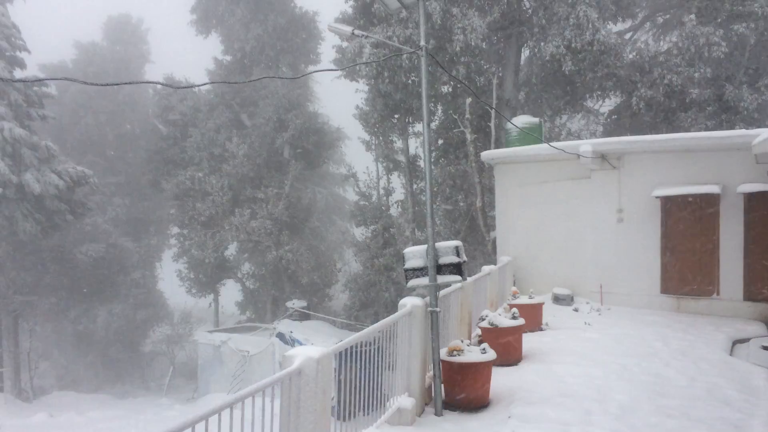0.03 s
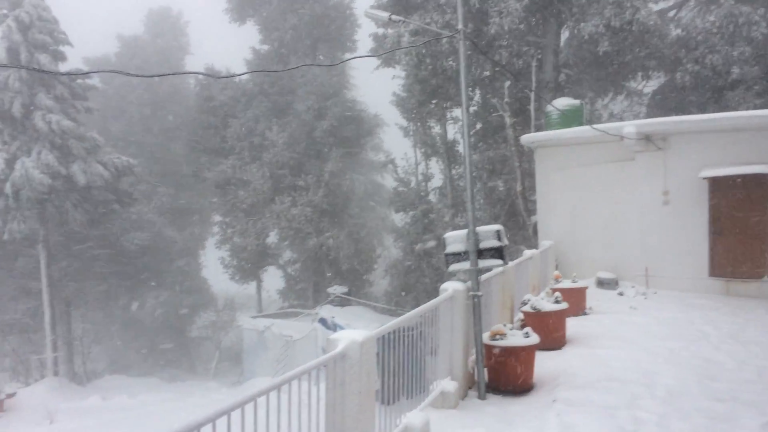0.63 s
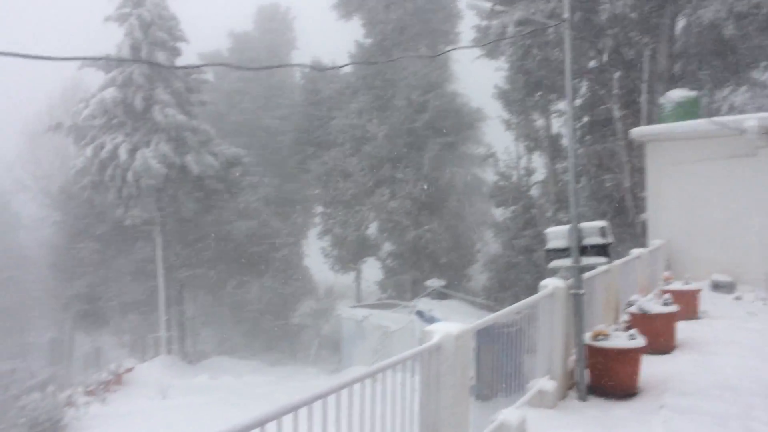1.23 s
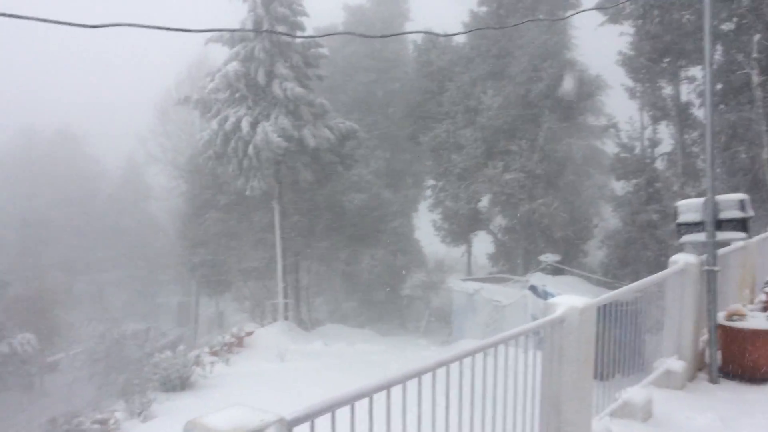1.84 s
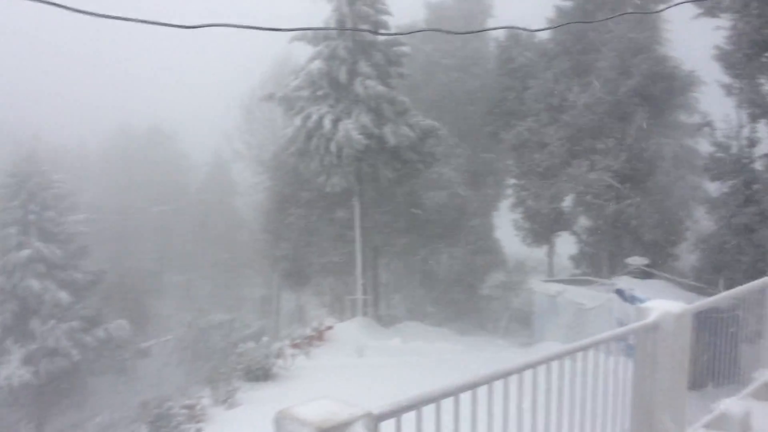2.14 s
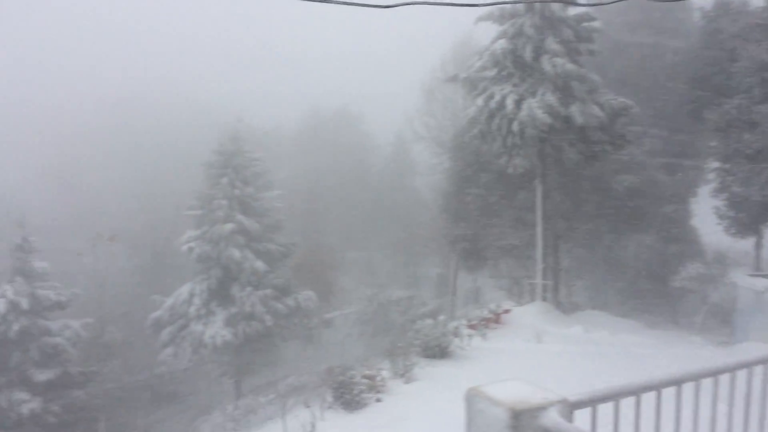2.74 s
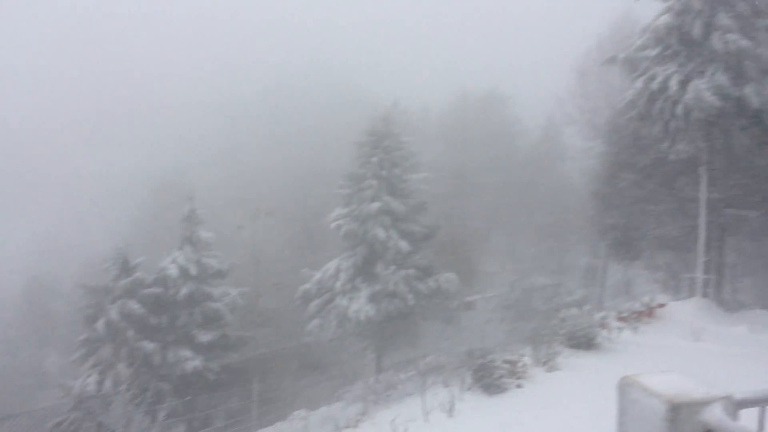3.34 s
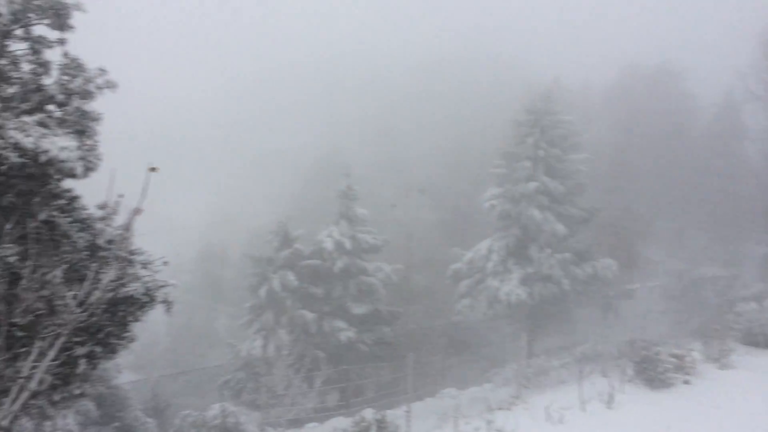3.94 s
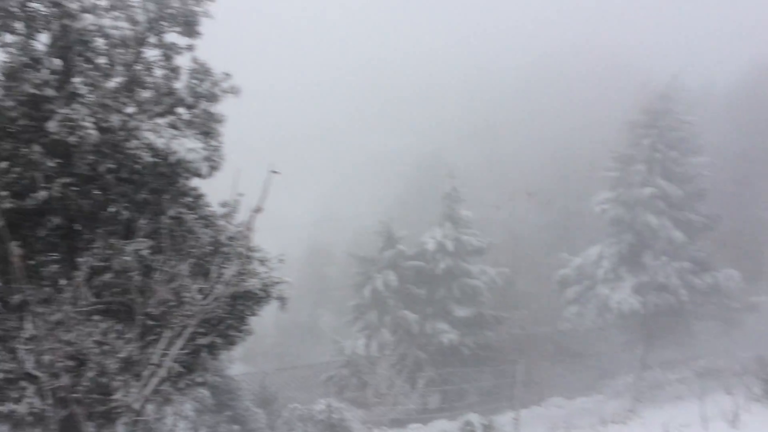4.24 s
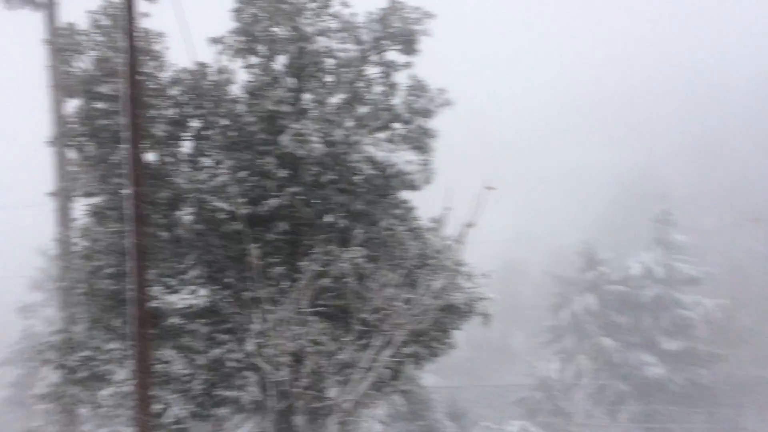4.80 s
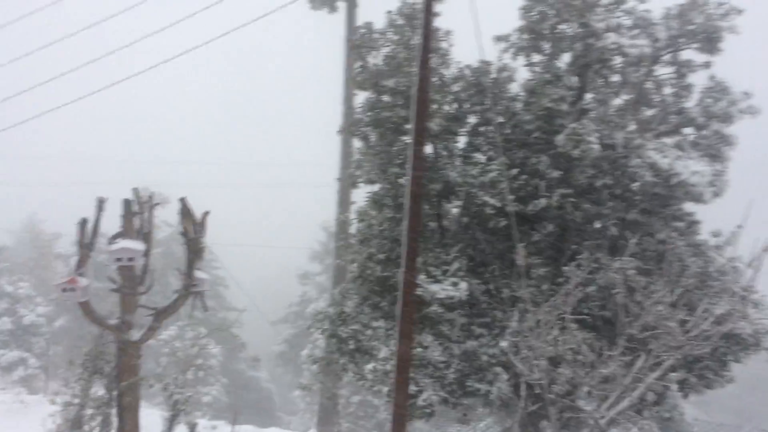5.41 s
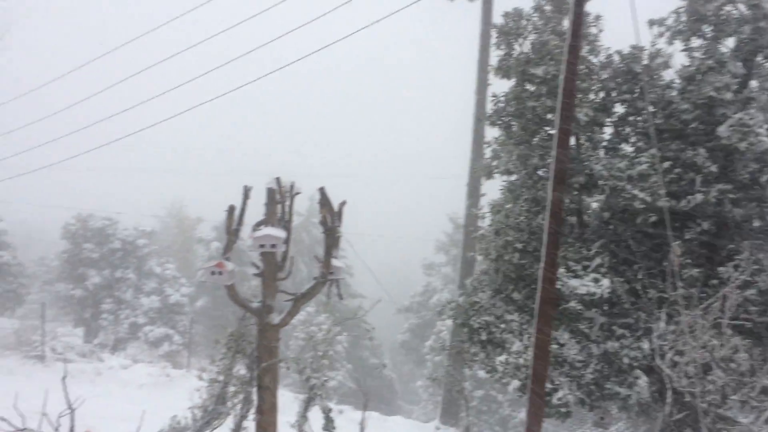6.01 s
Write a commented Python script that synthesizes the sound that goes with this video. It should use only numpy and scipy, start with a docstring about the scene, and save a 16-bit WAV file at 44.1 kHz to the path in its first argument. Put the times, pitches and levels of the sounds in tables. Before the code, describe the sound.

Outdoors in falling snow, wind rumbles and thumps on the microphone, easing briefly and then gusting harder.

```python
"""A gusty rumble of wind on a small hand-held microphone, in a snowstorm on a wooded hillside.
Turbulent eddies sweep over the port: the faster the air, the louder and higher the rumble,
and single vortices strike as dull pops. Behind it trees rush, blown snow hisses and grains tick
on the casing. A few faint, thin whistles sound far off, and finger knocks ring the casing's modes."""
import sys
import numpy as np
from scipy import signal
from scipy.fft import rfft, irfft, next_fast_len
from scipy.io import wavfile
from scipy.ndimage import uniform_filter1d, map_coordinates

SR = 44100
rng = np.random.default_rng(int(sys.argv[2]) if len(sys.argv) > 2 else 0)


def dump_mix(stems):
    """Bounce the given channels to the path in sys.argv[1] as a 16-bit WAV at rate SR."""
    frames = np.atleast_2d(stems).T  # one column per channel
    limited = np.clip(frames, -1, 1)  # hard clip at full scale
    pcm = np.round(limited * 32767).astype(np.int16)
    wavfile.write(sys.argv[1], SR, pcm)


N = 267246
TIME = np.arange(N) / SR


def from_db(db):
    """Amplitude ratio of a level in decibels."""
    return 10 ** (np.asarray(db) / 20)

def rms_one(x):
    """Normalisation to unit rms."""
    return x / np.sqrt(np.mean(x ** 2) + 1e-20)

def in_time(rows):
    """Linear interpolation of each column of a time curve at every sample."""
    times, *columns = np.transpose(rows)
    return [np.interp(TIME, times, column) for column in columns]

def butter(x, hz, kind, order=2):
    """Causal Butterworth filter."""
    sections = signal.butter(order, np.minimum(hz, .45 * SR), kind, fs=SR, output="sos")
    return signal.sosfilt(sections, x + 1e-18)

def fluctuation(hz, order=4):
    """Low-passed Gaussian noise of unit rms."""
    return rms_one(butter(rng.standard_normal(N), hz, "low", order))


# Breeze at the port: (time [s], eddy passing rate [Hz], relative pressure level [dB])
BREEZE = [(0.09, 228, -26.5), (0.44, 280.8, -23.5), (0.72, 179.8, -36), (0.98, 173.2, -29.5),
          (1.33, 202.4, -32.0), (1.44, 79, -44), (1.61, 125.3, -36.5), (2.04, 194.3, -26.5),
          (2.56, 161.6, -33.5), (2.77, 66.14, -43.5), (3.11, 117, -37.5), (3.33, 202.6, -19.5),
          (3.57, 151.3, -31.5), (3.82, 365.8, -19), (4.18, 289.9, -27.0), (4.81, 458.7, -19),
          (5.03, 220.3, -26.5), (5.14, 289.9, -21.5), (5.52, 183.9, -28), (6.06, 174.5, -29.5)]
# Gusts on top of it: (arrival [s], hold [s], relative pressure level [dB])
GUSTS = [(0.108, 0.019, -16), (0.184, 0.067, -23), (0.286, 0.075, -18), (0.52, 0.035, -24),
         (0.577, 0.0092, -14.0), (0.724, 0.0068, -18.0), (0.806, 0.017, -18.5), (0.862, 0.013, -21),
         (1.081, 0.07, -25.5), (1.238, 0.086, -26), (1.489, 0.11, -24), (1.633, 0.097, -21),
         (1.827, 0.025, -19.5), (2.127, 0.074, -17), (2.287, 0.0077, -23), (2.359, 0.019, -19.0),
         (2.434, 0.056, -23.5), (2.64, 0.064, -30), (2.773, 0.02, -31.5), (2.865, 0.042, -34.5),
         (3.023, 0.023, -31.5), (3.117, 0.011, -28.5), (3.172, 0.014, -25), (3.246, 0.073, -16.5),
         (3.427, 0.13, -24), (3.625, 0.089, -13.5), (3.748, 0.058, -17), (3.883, 0.064, -19),
         (3.977, 0.05, -17), (4.289, 0.069, -16.5), (4.452, 0.13, -13.5), (4.64, 0.017, -18.5),
         (4.721, 0.044, -15.3), (4.943, 0.021, -20.5), (5.211, 0.004, -16), (5.257, 0.034, -16),
         (5.353, 0.037, -22.5), (5.431, 0.022, -24), (5.605, 0.085, -25.5), (5.974, 0.029, -30)]

def airflow(rise_db_per_s=680, fall_db_per_s=820, surge_db=2, surge_hz=24.06, rate_exponent=.39):
    """Breeze and gusts add in power; the eddy passing rate follows a power law of the pressure."""
    breeze_hz, breeze_db = in_time(BREEZE)
    power = from_db(breeze_db) ** 2
    for arrival, hold_s, db in GUSTS:
        before_db = rise_db_per_s * np.maximum(arrival - TIME, 0)
        after_db = fall_db_per_s * np.maximum(TIME - arrival - hold_s, 0)
        power += from_db(db - np.minimum(before_db + after_db, 100)) ** 2
    pressure_db = 10 * np.log10(power) + surge_db * np.tanh(fluctuation(surge_hz))
    return breeze_hz * from_db(pressure_db - breeze_db) ** rate_exponent, pressure_db

def eddy_pressure(eddies_passed, steepness=1.32, smoothing_eddies=1.373, size=2 ** 18):
    """Spatial averaging: the port smooths away the fine ripples of a passing random pressure field."""
    steps_per_eddy = 64
    cycles_per_eddy = np.fft.rfftfreq(size) * steps_per_eddy
    rolloff = np.exp(-(smoothing_eddies * cycles_per_eddy) ** steepness)
    field = irfft(rfft(rng.standard_normal(size)) * rolloff, size)
    return map_coordinates(field, [eddies_passed * steps_per_eddy], order=3, mode="wrap")

def evened(x, span_s):
    """Division by the smoothed envelope holds the rms of a noise near 1."""
    power = np.abs(signal.hilbert(x, next_fast_len(N))[:N]) ** 2 / 2
    for _ in range(3):
        power = uniform_filter1d(power, int(span_s * SR))
    return x / np.sqrt(np.abs(power) + 1e-12)

def wind_rumble(rate_hz, pressure_db, level_db, flutter_db, flutter_hz, bass_cut_hz):
    """Frozen turbulence: eddies ride past the port, so air speed stretches the whole spectrum."""
    speed_ratio = from_db(flutter_db * np.tanh(fluctuation(flutter_hz)))
    eddies_passed = np.cumsum(rate_hz * speed_ratio) / SR
    pressure = speed_ratio ** 2 * eddy_pressure(eddies_passed)  # pressure goes with speed squared
    rumble = from_db(pressure_db + level_db) * evened(pressure, span_s=0.016)
    return butter(rumble, bass_cut_hz, "high", order=3)  # the microphone drops the deepest bass


def coloured_noise(spectrum):
    """Spectral shaping of white noise, at unit rms."""
    hz, db = np.transpose(spectrum)
    bin_hz = np.maximum(np.fft.rfftfreq(N, 1 / SR), 1)
    gain = from_db(np.interp(np.log(bin_hz), np.log(hz), db))
    return rms_one(irfft(rfft(rng.standard_normal(N)) * gain, N))

# Wind in the trees: (time [s], level [dB])
TREE_LEVEL = [(0, -62), (.9, -63.5), (1.4, -59), (2.0, -59.5), (3.1, -59), (3.5, -62.5), (5.4, -63),
              (5.7, -60), (6.06, -59)]
# Its spectrum: (frequency [Hz], relative spectral density [dB])
TREE_SPECTRUM = [(100, -2), (350, 0), (600, -2.5), (1000, -5), (1500, -8.5), (2000, -17), (3000, -27),
                 (7000, -50)]

def tree_rush():
    """Aerodynamic noise: wind in distant trees makes a smooth, dark rush."""
    return from_db(in_time(TREE_LEVEL)[0]) * coloured_noise(TREE_SPECTRUM)


# Blown snow: (time [s], level [dB])
SNOW_LEVEL = [(.1, -72), (.95, -75.5), (1.25, -70.5), (2.1, -73.5), (3.2, -71), (3.35, -76), (4.8, -75.5),
              (5.5, -74), (5.72, -68.5), (6.06, -68)]
# Its spectrum: (frequency [Hz], relative spectral density [dB])
SNOW_SPECTRUM = [(500, -10), (2000, 0), (4500, 0), (7000, -2), (10000, -5), (13000, -8), (16000, -14)]

def snow_hiss():
    """Incoherent summation: countless drifting grains merge into a fine hiss."""
    return from_db(in_time(SNOW_LEVEL)[0]) * coloured_noise(SNOW_SPECTRUM)


# Largest snow grains on the casing: (time [s], relative level [dB])
LARGE_GRAINS = [(4.0097, -47.5), (4.219, -48), (4.3881, -43), (4.5467, -38.5), (4.7802, -43.5),
                (4.9152, -43.5), (5.1875, -42), (5.5174, -45.5), (5.5986, -46), (5.6161, -44), (5.697, -43),
                (6.0245, -37)]

def snow_ticks(large_db, decay_s, low_hz, high_hz, grains_per_s=30):
    """Impact noise: each icy grain crumbles on the casing in a bright, exponentially decaying burst."""
    # tiny grains land at random, as strongly as the snow blows
    landings = rng.random(N) < grains_per_s / SR
    hits = landings * rng.random(N) * from_db(in_time(SNOW_LEVEL)[0] + 2.0)
    for time, db in LARGE_GRAINS:
        hits[round(time * SR)] += from_db(db + large_db)
    envelope = signal.lfilter([1], [1, -np.exp(-1 / (decay_s * SR))], hits + 1e-18)
    bursts = envelope * rng.standard_normal(N)
    return butter(butter(bursts, low_hz, "high"), high_hz, "low")


def vortex_pulses(rows, level_db, steepness, size=2048):
    """Time scaling: a vortex is one swing of pressure, shorter and brighter the faster it passes."""
    out, hz = np.zeros(N + size), np.fft.rfftfreq(size, 1 / SR)
    # the angle of incidence makes it a push, a pull or one after the other
    angles = rng.uniform(0, 2 * np.pi, N)
    for time, db, rate_hz in rows:
        at = round(time * SR)
        spectrum = hz / rate_hz * np.exp(-(hz / rate_hz) ** steepness)
        head_on_peak = irfft(spectrum, size)[0]
        pulse = np.fft.fftshift(irfft(spectrum * np.exp(1j * angles[at]), size)) / head_on_peak
        out[at:at + size] += from_db(db + level_db) * pulse * np.hanning(size)
    return out[size // 2:size // 2 + N]

def small_vortices(rate_hz, pressure_db, level_db, rate_ratio, spread_db, storm_hz, candidates=900):
    """Vortex shedding: rows of small vortices whose number grows with the square of the air speed."""
    when, chance, weakness = rng.random((candidates, 3)).T
    at = (when * (N - 1)).astype(int)
    db = pressure_db[at] + level_db - spread_db * weakness
    rows = np.transpose([TIME[at], db, rate_ratio * rate_hz[at]])
    return rows[chance < (rate_hz[at] / storm_hz) ** 2]

def fragments(rows, loss_db, rate_ratio, scatter_s, spread_db=3, count=3):
    """Vortex breakup on the port's rim: rows of weaker, quicker vortices that make each pop ragged."""
    time, db, rate_hz = np.repeat(rows, count, axis=0).T
    shift, strength = rng.uniform(-1, 1, (len(time), 2)).T
    fragment_db = db - loss_db + spread_db * strength
    return np.transpose([time + scatter_s * shift, fragment_db, rate_ratio * rate_hz])

# Hardest vortices at the port: (time [s], relative level [dB], passing rate [Hz])
HARD_VORTICES = [(0.129, -7.5, 151), (0.217, -15, 365), (0.356, -17.5, 603), (0.587, -11.5, 544),
                 (0.723, -17.5, 607), (0.736, -5, 482), (0.812, -7, 375), (0.865, -13.5, 385.5),
                 (1.716, -17.5, 492.2), (2.177, -14.5, 646), (2.363, -12, 424.2), (3.285, -9, 454.6),
                 (3.642, -11, 354.8), (3.665, -9.5, 1095), (3.7, -6.5, 698), (3.758, -10.5, 581.8),
                 (3.781, -13.5, 451), (3.808, -11, 602.2), (3.915, -3, 329.6), (4.017, -9.5, 458),
                 (4.287, -9.5, 598), (4.349, -9, 490.4), (4.411, -1.5, 230.2), (4.451, -6, 542),
                 (4.488, -9, 538), (4.523, 0, 598.4), (4.548, -17, 1545), (4.557, -4.5, 1309),
                 (4.577, -9.5, 770.5), (4.636, -7, 775.2), (4.728, -3, 1203), (4.744, -10.5, 767),
                 (4.775, -10, 996.5), (4.883, -11, 938.8), (5.21, -7, 529.4), (5.26, -7.5, 504.2),
                 (5.43, -8.5, 300.7)]

def vortex_pops(rate_hz, pressure_db):
    """Superposition of pressure pulses: hard vortices pop, small ones and fragments crackle."""
    shed = small_vortices(rate_hz, pressure_db, level_db=1, rate_ratio=1.13, spread_db=14.5, storm_hz=481)
    broken = fragments(HARD_VORTICES, loss_db=18, rate_ratio=1.154, scatter_s=.004)
    pops = vortex_pulses(HARD_VORTICES, level_db=-1, steepness=1.705)
    crackle = vortex_pulses(np.vstack([shed, broken]), level_db=-3, steepness=1.334)
    return pops + crackle


# Thin, far whistles: (centre time [s], half duration [s], frequency [Hz], greatest rms level [dB])
WHISTLES = [(0.317, 0.036, 3420, -72.5), (0.37, 0.045, 3470, -82), (0.46, 0.077, 3400, -73),
            (0.466, 0.09, 5560, -81), (1.306, 0.056, 1130, -60), (1.454, 0.053, 1110, -63.5),
            (1.326, 0.089, 5600, -82), (1.46, 0.073, 5600, -79)]

def whistles(waver_hz):
    """Random frequency modulation makes short tones waver as they swell and fade."""
    out = np.zeros(N)
    waver = waver_hz * fluctuation(60, order=2)
    for centre, half_s, hz, db in WHISTLES:
        swell = np.cos(np.pi / 2 * np.clip((TIME - centre) / half_s, -1, 1)) ** 2
        phase = 2 * np.pi * np.cumsum(hz + waver) / SR
        out += np.sqrt(2) * from_db(db) * swell * np.sin(phase)
    return out


def ring(force, hz, t60):
    """Damped resonator: a unit impulse starts a decaying sine of amplitude 1."""
    radius, angle = from_db(-60 / (t60 * SR)), 2 * np.pi * hz / SR
    return signal.lfilter([0, np.sin(angle)], [1, -2 * radius * np.cos(angle), radius ** 2], force + 1e-18)

# Finger knocks: (time [s], relative level [dB], contact cutoff [Hz])
KNOCKS = [(1.2175, -5.5, 1071), (1.228, -5.5, 747.6), (5.8675, -15.5, 6025)]
# Modes of the casing: (frequency [Hz], relative level [dB], 60 dB decay time [s])
CASING_MODES = [(684.5, -14, 0.014), (1120, -3.5, 0.0044), (1510, -5, 0.0034), (2750, -17.5, 0.003),
                (4300, -28, 0.0052)]

def finger_knocks(level_db):
    """Modal resonance: a finger briefly rings the casing; the harder the contact, the brighter."""
    force = np.zeros(N)
    for time, db, cutoff_hz in KNOCKS:
        impulse = from_db(db + level_db) * signal.unit_impulse(N, round(time * SR))
        force += butter(impulse, cutoff_hz, "low")
    modes = [from_db(db) * ring(force, hz, t60) for hz, db, t60 in CASING_MODES]
    return sum(modes[::2]) - sum(modes[1::2])  # neighbouring modes alternate in sign


def scene():
    """Superposition of wind on the port, the quiet hillside and impacts on the casing."""
    rate_hz, pressure_db = airflow()
    rumble = wind_rumble(rate_hz, pressure_db, level_db=1, flutter_db=2, flutter_hz=89.24,
                         bass_cut_hz=65.4)
    pops = vortex_pops(rate_hz, pressure_db)
    ticks = snow_ticks(large_db=-9.5, decay_s=0.0027, low_hz=4500, high_hz=12500)
    hillside = tree_rush() + snow_hiss() + whistles(waver_hz=25)
    return (rumble + pops + ticks + hillside + finger_knocks(level_db=-4))[None]

def record(dry):
    """Saturation and band limiting: the sound fades in and out briefly, the microphone rounds blasts and cuts
    the top."""
    start_s, fade_s, stopband_hz = .083, .004, 16000
    opened = dry * np.clip(np.minimum(TIME - start_s, TIME[-1] - TIME) / fade_s, 0, 1)
    rounded = 0.86 * np.tanh(opened / 0.85)
    return signal.sosfilt(signal.cheby2(16, 60, stopband_hz, fs=SR, output="sos"), rounded)


dry = scene()
out = record(dry)
dump_mix(out)
```